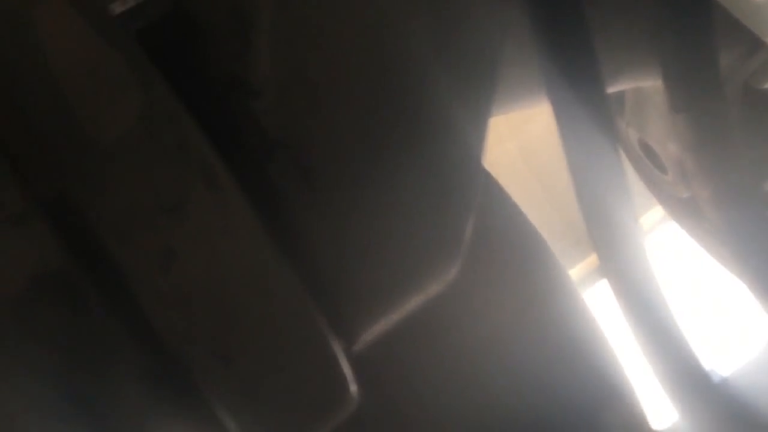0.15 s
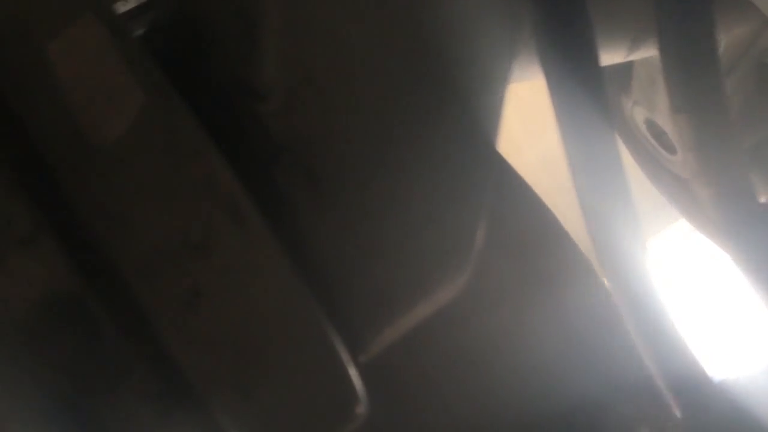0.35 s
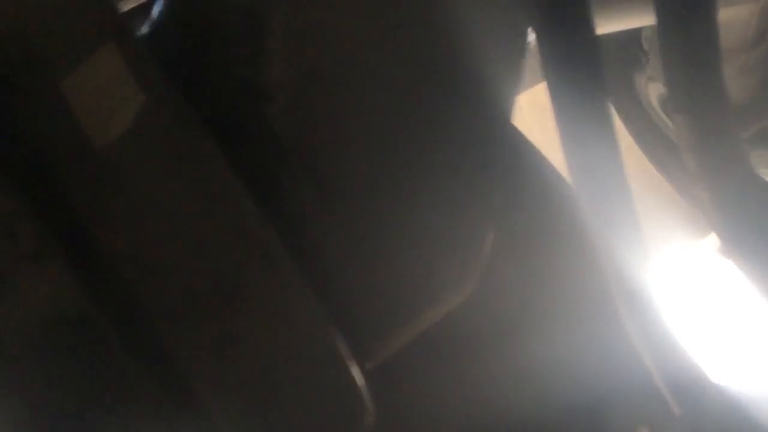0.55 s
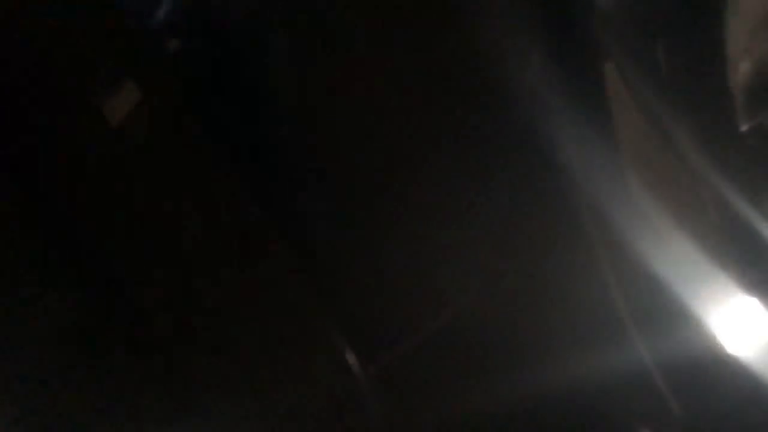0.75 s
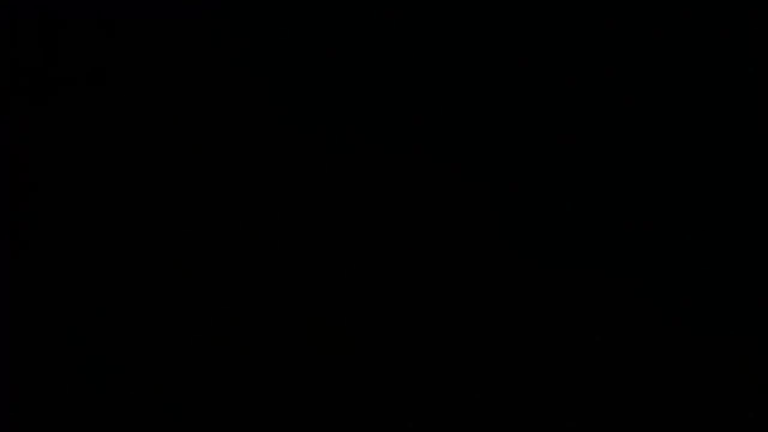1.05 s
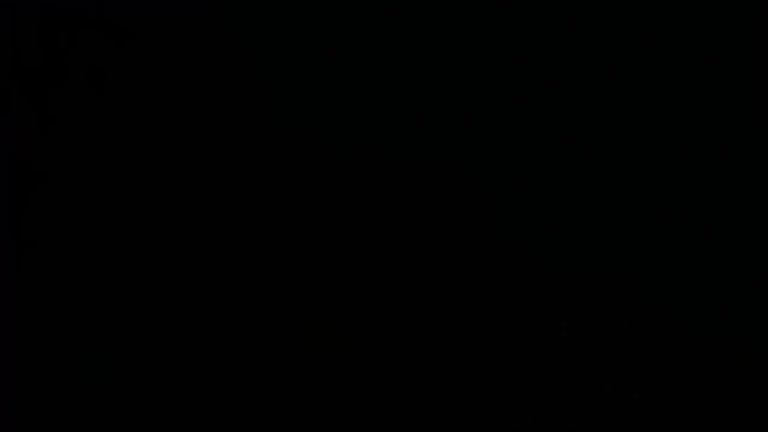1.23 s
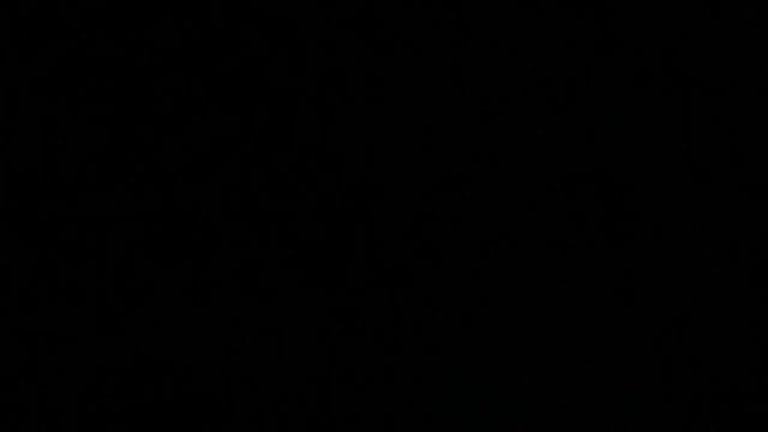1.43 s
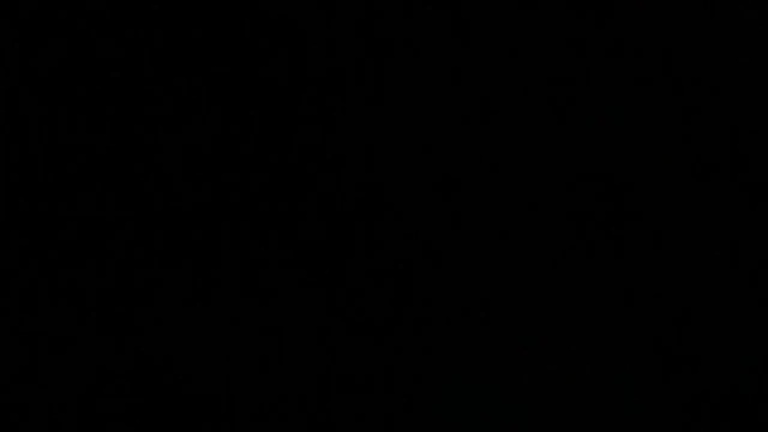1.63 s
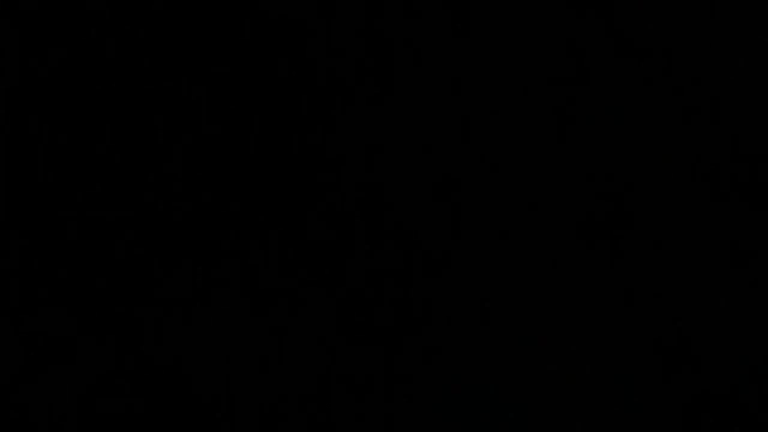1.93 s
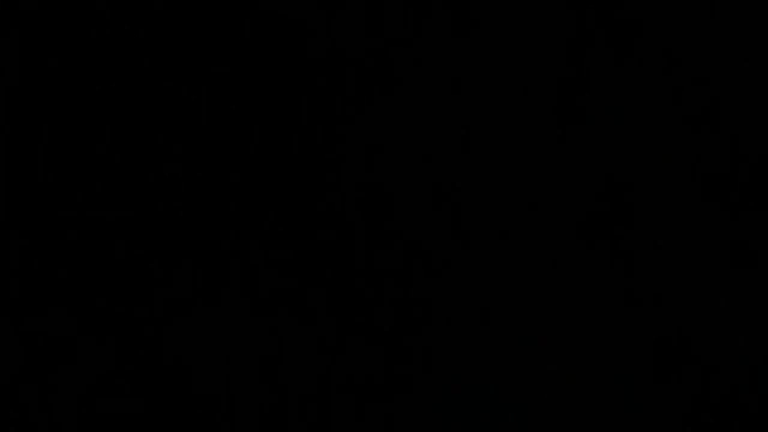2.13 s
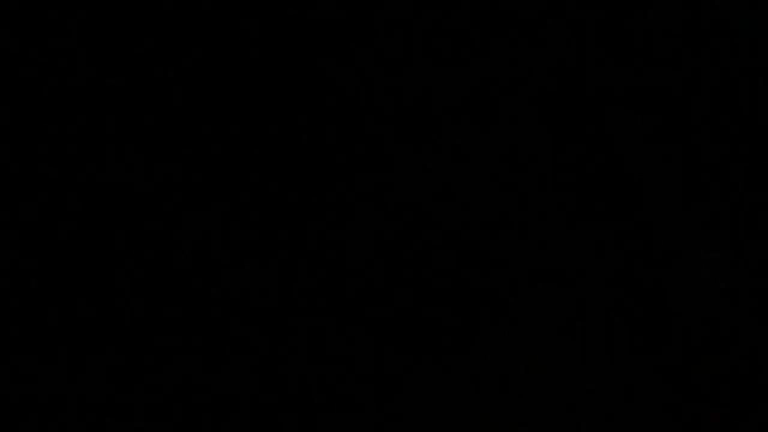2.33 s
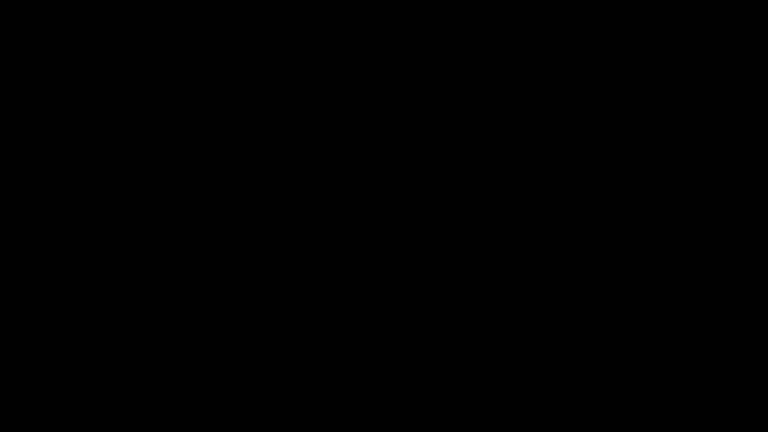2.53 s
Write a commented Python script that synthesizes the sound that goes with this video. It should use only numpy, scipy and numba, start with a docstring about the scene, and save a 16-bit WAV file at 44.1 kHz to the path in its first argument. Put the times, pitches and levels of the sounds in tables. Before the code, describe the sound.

Landing gear clunks hard into its lock inside an aircraft wheel bay, over heavy low rumble

```python
"""Inside the wheel bay of a flying aircraft, heard at one microphone: shaped noise makes the airframe's rumble
and the slipstream's rush through the door gap, over faint whines built of wavering sines.
The gear clunks into its lock, the latch scrapes home and the doors rattle shut: taps and ticks ring the metal.
The rush falls away, baring the whines, then partly returns."""
import sys
import numpy as np
from scipy import signal
from scipy.fft import rfft, irfft
from scipy.io import wavfile
from scipy.ndimage import uniform_filter1d
from numba import njit

SR = 44100
rng = np.random.default_rng(int(sys.argv[2]) if len(sys.argv) > 2 else 0)


def unload_wav(signal):
    """Save mono or channel-first audio to the path in sys.argv[1] as 16-bit WAV at rate SR, clipped to [-1, 1]."""
    wavfile.write(
        sys.argv[1],
        SR,
        np.round(np.clip(np.atleast_2d(signal).T, -1, 1) * 32767).astype(np.int16),
    )


N = 118188
T = np.arange(N) / SR


def undb(db):
    """Gain of a dB value."""
    return 10 ** (np.asarray(db) / 20)


def level(x, db):
    """Set the rms level in dB."""
    return x * undb(db) / np.sqrt(np.mean(x ** 2))


def shape_db(table, hz):
    """Read a spectrum in dB, interpolated on a log frequency axis."""
    table = np.array(table)
    return np.interp(np.log(np.maximum(hz, 1)), np.log(table[:, 0]), table[:, 1])


def walk(rate):
    """Random levels, each held 1 / rate seconds, then smoothed into glides; spread near 1."""
    hold = int(SR / rate)
    steps = np.repeat(rng.standard_normal(N // hold + 1), hold)
    glides = uniform_filter1d(uniform_filter1d(steps, hold), hold)
    return 0.88 * glides[:N]


def airflow(table):
    """Noise through the bay's resonances; octave bands swell together and flicker alone."""
    # Resonances of the bay. Each row: frequency in Hz, width in Hz, lift in dB.
    bay = [(60.7, 16, 6), (196.6, 10, 1.5), (345.5, 23, 5), (440, 12.3, 7), (668, 24, 5.5), (974, 55, 3),
           (2210, 900, 6.5), (4350, 480, 3)]
    swell_db, flicker_db = -0.74, 1.0
    hz = np.arange(N // 2 + 1) * SR / N
    db = shape_db(table, hz)
    for center, width, lift in bay:
        db = db + lift / (1 + (2 * (hz - center) / width) ** 2)
    spectrum = rfft(rng.standard_normal(N)) * undb(db)
    swell = walk(0.5)
    octave = np.log2(np.maximum(hz, 16) / 16)
    out = 0
    for k in range(11):
        # overlapping triangles, one octave apart
        band = irfft(spectrum * np.clip(1 - np.abs(octave - k), 0, 1), N)
        out = out + band * undb(swell_db * swell + flicker_db * walk(13))
    return level(out, 0)


def rumble():
    """Airframe rumble: low, shaped noise at a set rms level."""
    # Spectrum of the rumble. Each row: frequency in Hz, relative density in dB per Hz.
    rumble_curve = [(12, -64), (20, -47.5), (41, -9), (70, -2), (106, -5), (157, -10), (239, -12.5),
                    (315, -22), (343, -23.5), (416, -30), (598, -28.5), (650, -30), (1070, -41.5),
                    (2280, -52), (3870, -57.5), (4970, -54), (15600, -90)]
    return undb(-16) * airflow(rumble_curve)


def rush():
    """Slipstream through the door gap: shaped noise whose level follows the closing doors."""
    # Spectrum of the rush. Each row: frequency in Hz, relative density in dB per Hz.
    rush_curve = [(100, -7), (200, 3), (290, -10.5), (450, -14.5), (540, -12.5), (680, -10.5),
                  (1300, -24.5), (2400, -32.5), (3200, -37), (5000, -33), (7500, -40), (10000, -54.5),
                  (15700, -67.5)]
    # Level of the rush as the doors close. Each row: time in seconds, level in dB.
    gap_levels = [(0, -22), (.5, -22), (.9, -24.5), (1.05, -22.5), (1.15, -29.5), (1.21, -34.5),
                  (1.25, -42.5), (1.6, -38.5), (2.2, -34), (2.6, -32)]
    gap = undb(np.interp(T, *np.array(gap_levels).T))
    return gap * airflow(rush_curve)


def whines():
    """Sines that each waver in level and share a slight waver in pitch."""
    # Pump whine. Each row: multiple of the pump's pitch, level in dB rms before the waver.
    pump = [(1, -61.5), (3, -64.5), (4, -69), (5, -64.5), (6, -79), (7, -69.5), (8, -81.5), (9, -80.5),
            (10, -93.5), (11, -91), (12, -99.5), (13, -98.5)]
    # Second whine. Each row: frequency in Hz, level in dB rms before the waver.
    second_whine = [(2466, -64), (4931, -78)]
    pump_hz = 1027.3
    waver_db, pitch_waver = 3.5, 0.0002  # the pitch waver is a share of the pitch
    lines = [(multiple * pump_hz, db) for multiple, db in pump]
    lines += [(hz, db) for hz, db in second_whine]
    clock = np.cumsum(1 + pitch_waver * walk(5)) / SR
    out = np.zeros(N)
    for hz, db in lines:
        peak = np.sqrt(2) * undb(db + waver_db * walk(9))
        out += peak * np.sin(2 * np.pi * (hz * clock + rng.random()))
    return out


def ringing(tilt_db, struck_hz, size):
    """Response of the metal to one tap: decaying modes, lifted around the pitch struck most."""
    # What struts and door panels ring with. Each row: frequency in Hz, relative level in dB, t60 in seconds.
    metal = [(119, -2.5, .12), (181.9, 6, 0.13), (329.5, 0, 0.068), (489, -10, .05), (803, -20.5, 0.056),
             (934, -7.5, 0.03), (1220, -12.5, 0.033), (1520, -18, 0.019), (1836, -11.5, .022),
             (2270, -13, 0.031), (2550, -19.5, 0.038), (3490, -21.5, 0.026), (3830, -25.5, 0.016),
             (4350, -24.5, 0.034), (4600, -35, .015)]
    struck_db, struck_octaves = 12, 0.29  # lift and its reach
    hz, db, t60 = np.array(metal).T[:, :, None]
    t = T[:size]
    db = db + tilt_db * np.log2(hz / 1000)
    db = db + struck_db * np.exp(-(np.log2(hz / struck_hz) / struck_octaves) ** 2)
    decay = np.exp(-np.log(1000) * t / t60)
    onset = 1 - np.exp(-t * hz)  # builds up over about one period
    return np.sum(undb(db) * np.sin(2 * np.pi * hz * t) * decay * onset, axis=0)


def scrape():
    """The latch scrapes home: dense stick-slip ticks of random size and sign ring the same metal."""
    # Course of the scrape. Each row: time in seconds, level in dB.
    scrape_levels = [(.95, -70), (.98, -45), (1.01, -35), (1.05, -36), (1.08, -38), (1.11, -35),
                     (1.14, -39), (1.22, -49), (1.26, -68)]
    ticks_per_s, spread_db, tilt_db = 900, 3, 3  # tilt in dB per octave
    ticks = (rng.random(N) < ticks_per_s / SR) * undb(spread_db * rng.exponential(size=N))
    ticks = ticks * rng.choice([-1, 1], N)
    rung = signal.fftconvolve(ticks, ringing(tilt_db, 4350, size=4096))[:N]
    course_db = np.interp(T, *np.array(scrape_levels).T, left=-200, right=-200)
    return level(rung, 0) * undb(course_db)


def blows():
    """Each blow is a firm tap and a short clatter that ring the metal, with a crack that the bay draws out."""
    # Blows of gear and doors. Each row: start in seconds, ring level in dB, crack level in dB,
    # tilt of the ring in dB per octave, decay time of the clatter in seconds, pitch struck most in Hz.
    blow_list = [(.907, -20.5, -29, 1, 0.013, 695), (0.9225, -15, -8, 1.5, 0.0011, 970),
                 (0.926, -10, -11.5, -6, 0.0026, 183), (.936, -13, -24, -3.5, 0.02, 252),
                 (0.99, -13, -45, -15.5, 0.0027, 122), (1.043, -38, -37, -2, .006, 4400),
                 (1.069, -20, -25.5, 0.5, .016, 875), (1.099, -18, -25, 0.5, 0.015, 780),
                 (1.119, -19, -30, -3.5, 0.013, 330), (1.1492, -31, -22.5, 6, 0.0067, 2500),
                 (1.161, -22, -27, -9, .003, 780), (1.189, -34, -34, -1.5, 0.0041, 1560),
                 (1.207, -31.5, -33.5, 0, 0.0096, 800), (1.5147, -33, -37, -0.5, 0.003, 2270)]
    # Spectrum of the crack. Each row: frequency in Hz, relative density in dB per Hz.
    crack_curve = [(100, -16.5), (400, 17), (1000, 6), (2500, -7.5), (5000, -9), (7000, -19.5), (8500, -21),
                   (10000, -36), (12000, -32.5), (15700, -45)]
    rise_s, rise_share = 0.00061, 0.25  # the share of the clatter's decay time adds to the rise
    tail_db, tail_s = -14.5, 0.02
    soft_dull_db = 0.26  # treble lost for each dB that a crack is weaker, nearing this many dB per octave
    size = 8192
    t, hz = T[:size], np.arange(size // 2 + 1) * SR / size
    out = np.zeros(N)
    for start, ring_db, crack_db, tilt_db, length, struck_hz in blow_list:
        noise = rng.standard_normal(size)
        rise = 1 - np.exp(-(t / (rise_s + rise_share * length)) ** 2)
        clatter = np.exp(-t / length)

        taps = noise * rise * clatter
        taps[0] = 0.65 * np.sqrt(length * SR)  # the firm first tap
        response = ringing(tilt_db, struck_hz, size=size)
        ring = irfft(rfft(response) * rfft(taps), size)

        crack_shape = shape_db(crack_curve, hz)
        crack_shape = crack_shape + soft_dull_db * (crack_db + 13.5) * np.log2(1 + hz / 4000)
        colored = irfft(rfft(noise) * undb(crack_shape), size)
        crack = rise * (clatter + undb(tail_db) * np.exp(-t / tail_s)) * colored

        i = int(start * SR)
        opening = int(SR * (2 * length + rise_s))  # levels hold over this first stretch
        for sound, db in ((ring, ring_db), (crack, crack_db)):
            out[i:i + size] += undb(db) * sound / np.sqrt(np.mean(sound[:opening] ** 2))
    return out


def scene():
    """Rumble, rush, whines, scrape and blows at one microphone."""
    return (rumble() + rush() + whines() + scrape() + blows())[None]


@njit
def follow(x, up, down):
    """Envelope that rises fast and falls slowly."""
    out, e = np.empty(len(x)), 0.2
    for i in range(len(x)):
        e += (abs(x[i]) - e) * (up if abs(x[i]) > e else down)
        out[i] = e
    return out


def record(dry):
    """Gain control holds the loud swells down, peaks are rounded and the top is cut."""
    limit_db, ratio = -10, 1.83
    attack_s, release_s = 0.0025, 0.057
    top_hz = 15700
    envelope = follow(dry[0], 1 / (attack_s * SR), 1 / (release_s * SR))
    held = dry * np.minimum(1, undb(limit_db) / envelope) ** (1 - 1 / ratio)
    rounded = np.tanh(held)
    top_cut = signal.ellip(12, 0.2, 70, top_hz, fs=SR, output="sos")
    return signal.sosfilt(top_cut, rounded)


dry = scene()
out = record(dry)
unload_wav(out)
```